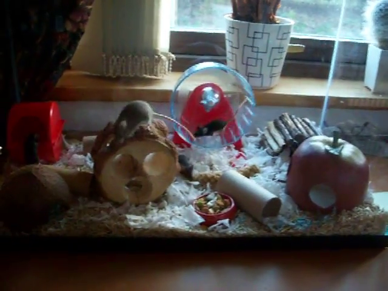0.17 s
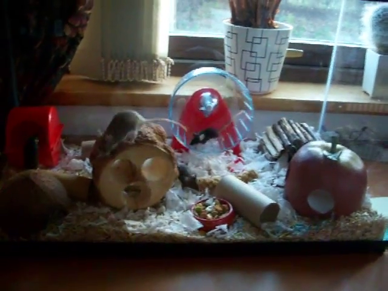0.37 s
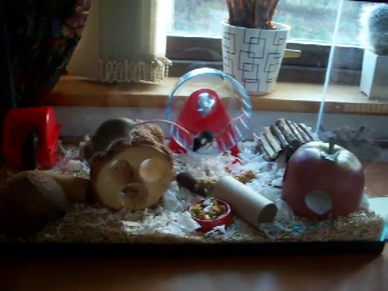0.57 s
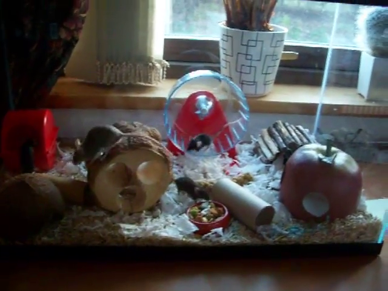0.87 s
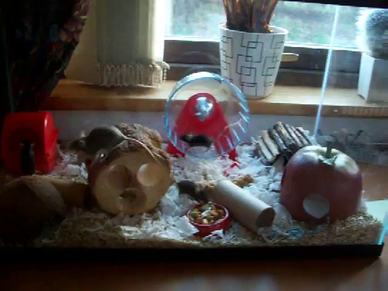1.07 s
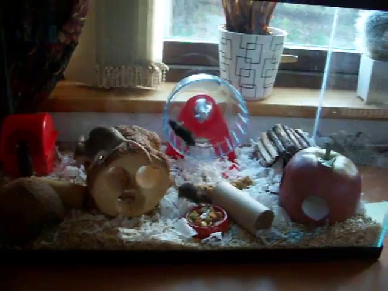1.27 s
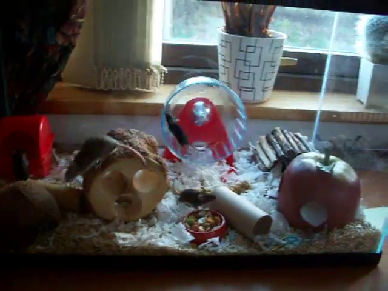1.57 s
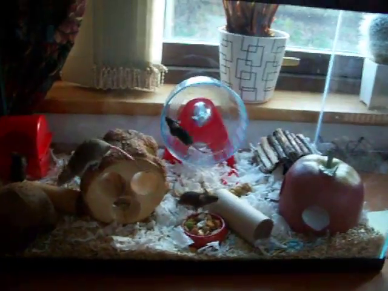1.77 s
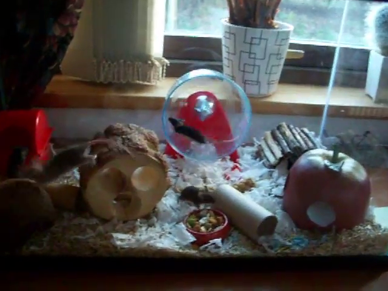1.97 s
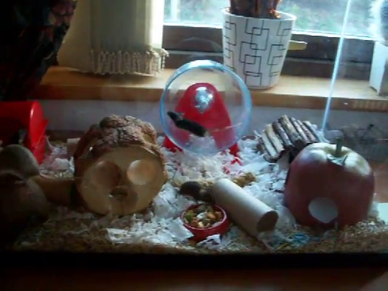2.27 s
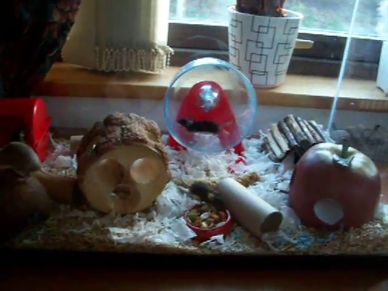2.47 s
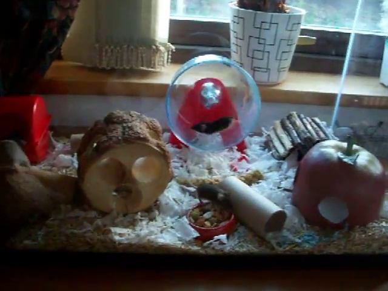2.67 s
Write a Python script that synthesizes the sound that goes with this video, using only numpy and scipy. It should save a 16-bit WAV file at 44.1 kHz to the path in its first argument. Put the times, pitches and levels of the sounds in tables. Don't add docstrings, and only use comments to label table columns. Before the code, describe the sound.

A mouse runs in a plastic exercise wheel, paws thumping fast and hollow, then stopping

```python
import sys
import numpy as np
from scipy import signal
from scipy.fft import rfft, irfft
from scipy.io import wavfile
from scipy.ndimage import uniform_filter1d

SR = 44100
rng = np.random.default_rng(int(sys.argv[2]) if len(sys.argv) > 2 else 0)


def put_to_file(sound):
    columns = np.atleast_2d(sound).T
    safe = np.clip(columns, -1, 1)
    whole_steps = np.round(safe * 32767)
    wavfile.write(sys.argv[1], SR, whole_steps.astype(np.int16))


def nominal_scale(level):
    x = np.asarray(level, float) / 20
    return 10 ** x


N = 123921
T = np.arange(N) / SR

# [f/Hz, level/dB, t60/s]
WHEEL = [(167.5, -17.5, 0.22), (256, -13.5, 0.13), (324.74, -0.5, 0.13), (346.9, -4, .2),
         (396.6, -12, 0.22), (422.6, -13.5, 0.14), (547, -21, 0.13), (730, -35, .08), (844, -10, .12),
         (903, -23.5, .12), (1000, -6.5, 0.04), (1200, -28.5, 0.076), (1440, -13.5, .07)]
# [f/Hz, density/dB per Hz]
SLAP = [(300, -35.5), (500, 3.5), (1000, 2.5), (1600, -7), (2500, -12), (4000, -29.5), (8000, -23)]


def unit(x):
    return x / np.sqrt(np.mean(x ** 2))


def curve(rows, col=1):
    rows = np.array(rows)
    return np.interp(T, rows[:, 0], rows[:, col])


def sine(hz):
    return np.sin(2 * np.pi * np.cumsum(hz) / SR)


def coloured(points):
    hz, db = np.array(points, float).T
    log_f = np.log(np.maximum(np.arange(N // 2 + 1) * SR / N, 1))
    below = np.maximum(np.log(hz[0]) - log_f, 0)
    gain = nominal_scale(np.interp(log_f, np.log(hz), db) - 30 * below)
    return unit(irfft(rfft(rng.standard_normal(N)) * gain, N))


def narrow(hz, width_hz):
    b, a = signal.iirpeak(hz, hz / width_hz, SR)
    once = signal.lfilter(b, a, rng.standard_normal(N))
    return unit(signal.lfilter(b, a, once))


def walk(rate_hz):
    k = int(SR / rate_hz)
    steps = np.repeat(rng.standard_normal(N // k + 1), k)
    return unit(uniform_filter1d(uniform_filter1d(steps, k), k)[:N])


def ring(hz, t60_s, size):
    t = np.arange(size) / SR
    return np.sin(2 * np.pi * hz * t) * 1000. ** (-t / t60_s)


def burst(rise_s, t60_s):
    t = np.arange(SR // 2) / SR
    return (1 - np.exp(-t / rise_s)) * 1000. ** (-t / t60_s)


def add(out, at_s, x):
    i = int(np.clip(at_s * SR, 0, N - 1))
    out[i:i + len(x)] += x[:N - i]


def house():
    # [t/s, f/Hz, level/dB]
    motor = [(0, 66, -41), (.09, 67.3, -39.5), (.125, 67.7, -64), (.16, 66.8, -40), (.3, 66.8, -50),
             (.75, 69.8, -55), (1.1, 67.9, -52), (1.35, 68.38, -48.5), (1.55, 65.97, -45),
             (2.0, 65.3, -44.5), (2.4, 65.24, -41), (2.81, 62.9, -37)]
    # [t/s, level/dB]
    traffic = [
        (0, -54),
        (.5, -47),
        (1.1, -43.5),
        (1.5, -54.5),
        (2.1, -50),
        (2.5, -52),
        (2.7, -44.5),
        (2.81, -53),
    ]
    line = np.sqrt(2) * sine(curve(motor))
    rough = nominal_scale(-16) * narrow(66, width_hz=5.7)
    hum = nominal_scale(curve(motor, col=2)) * (line + rough)
    rumble = nominal_scale(curve(traffic)) * narrow(45.3, width_hz=7.9)
    sub = nominal_scale(-57) * narrow(25, width_hz=56)
    return hum + rumble + sub


def camera():
    # [f/Hz, density/dB per Hz]
    air = [(80, -6.5), (130, -9), (300, -11), (620, -22), (1500, -30), (3400, -33.5), (6000, -36),
           (9000, -37.5)]
    air_db, flicker_db = -44.5, .3
    whine_hz, whine_db = 4290, -69
    hiss = nominal_scale(air_db + flicker_db * walk(5.2)) * coloured(air)
    whine = nominal_scale(whine_db) * np.sqrt(2) * np.sin(2 * np.pi * whine_hz * T)
    return hiss + whine


def rolling():
    # [t/s, effort/dB]
    effort = [(0.0, -64), (0.29, -47.5), (0.44, -42.5), (0.94, -39.5), (1.07, -39), (1.35, -41),
              (1.5, -40.5), (2.04, -46), (2.31, -49), (2.54, -59), (2.81, -67)]
    # [t/s, level/dB]
    wobble = [(0.0, -79), (0.22, -41), (0.24, -47), (1.13, -44), (1.22, -62), (1.51, -45.5), (2.13, -55),
              (2.28, -52), (2.32, -54), (2.37, -64), (2.5, -54.5), (2.81, -42.5)]
    # [f/Hz, width/Hz, level/dB]
    floor_modes = [(101.8, 9.6, 0), (165, 10.7, -6.5)]
    roll_db, hiss_db = -4.5, -7.5
    shake = unit(sum(nominal_scale(db / 2) * narrow(hz, 2.2 / t60_s + 8) for hz, db, t60_s in WHEEL[1:7]))
    hiss = nominal_scale(hiss_db) * coloured(SLAP)
    floor = np.zeros(N)
    for hz, width_hz, db in floor_modes:
        line = sine(hz * (1 + .02 * walk(4.05)))
        floor += nominal_scale(db) * (narrow(hz, width_hz) + line)
    return nominal_scale(curve(effort) + roll_db) * (shake + hiss) + nominal_scale(curve(wobble) - 2) * floor


def scrapes():
    # [t/s, level/dB, f/Hz, dust re level/dB]
    events = [(0.0044, -42, 4290, -6), (0.0857, -40.5, 4290, -18), (0.2358, -39, 2940, -17),
              (0.417, -41.5, 2140, -9), (0.4476, -43, 2470, -13), (0.4947, -36.5, 3470, -16),
              (0.61, -39.5, 2080, -3.5), (0.632, -42, 4400, -12), (0.6788, -36.5, 2990, -11),
              (0.8089, -39.5, 3390, -4.5), (0.82, -35, 5230, -23), (0.8441, -39.5, 5000, -23),
              (0.8787, -41.5, 3950, -10), (0.9782, -39.5, 3660, -4.5), (1.0061, -39, 3070, -8.5),
              (1.0397, -33, 4020, -11.5), (1.0697, -38.5, 2110, -13), (1.1919, -34, 3970, -7.5),
              (1.2127, -36.5, 5360, 0), (1.2577, -38.5, 2800, -9), (1.2837, -43.5, 2710, -21),
              (1.3507, -33, 3990, -7), (1.3853, -38, 2150, -26), (1.4487, -33.5, 4520, -6.5),
              (1.5395, -41, 3282, -24), (1.707, -35, 2390, -31), (1.7454, -48, 2278, -20),
              (1.827, -41, 2330, -17), (1.8424, -38.5, 2760, -25)]
    # [f/Hz, density/dB per Hz]
    rustle = [(1200, -28.5), (2000, -5), (3500, -5), (5000, -7), (8500, -18)]
    # [f/Hz, density/dB per Hz]
    fine_dust = [(3500, -11), (5000, 2.5), (7000, 2.5), (9000, -14)]
    count, swarm_s = 45, 0.027
    scrape_db, tick_db, size_db = -34, 22.5, 2.5
    grain_t60_s, grain_spread = .012, .4
    squeak_share, squeak_spread, squeak_t60_s, squeak_db = .16, .03, .03, 3
    rustle_db, dust_db = -11.5, -4.5

    grains, wash, dust = np.zeros((3, N))
    for at_s, db, hz, event_dust_db in events:
        grain_db = db + scrape_db
        add(grains, at_s, nominal_scale(grain_db + tick_db) * ring(hz, grain_t60_s * 4, size=1500))
        delays, sizes = rng.exponential(size=(2, count))
        detunes = rng.standard_normal(count)
        for k, (delay, big, detune) in enumerate(zip(delays, sizes, detunes)):
            if k < squeak_share * count:
                pitch_hz = hz * np.exp(squeak_spread * detune)
                t60_s, extra_db = squeak_t60_s, squeak_db
            else:
                pitch_hz = hz * 1.2 * np.exp(grain_spread * detune)
                t60_s, extra_db = grain_t60_s, 0
            grain = ring(np.clip(pitch_hz, 800, 8800), t60_s, size=1500)
            add(grains, at_s + delay * swarm_s, nominal_scale(grain_db + extra_db + size_db * big) * grain)
        add(wash, at_s, nominal_scale(db + rustle_db) * burst(0.0012, t60_s=0.15))
        add(dust, at_s, nominal_scale(db + event_dust_db + dust_db) * burst(0.00078, t60_s=0.063))
    return grains + wash * coloured(rustle) + dust * coloured(fine_dust)


def bend():
    from_hz, to_hz, glide_s = 1900, 778, 0.014
    t = T[:SR // 8]
    hz = to_hz + (from_hz - to_hz) * np.exp(-t / glide_s)
    return sine(hz) * burst(0.0071, t60_s=.12)[:len(t)]


def footfalls():
    # [t/s, level/dB, slap re ring/dB]
    steps = [(.097, -44, -4), (.25, -21.5, -12.5), (.299, -33, -9), (.354, -25.5, -35),
             (0.397, -33.5, -28.5), (.454, -21.5, -11.5), (.471, -24, -19.5), (0.571, -25, -16.5),
             (.609, -30, -17), (.655, -22.5, -14.5), (.671, -22.5, -14), (0.709, -36.5, -24.5),
             (.79, -25.5, -20), (.871, -20.5, -13.5), (0.92, -37, -16), (0.978, -21.5, -11),
             (1.098, -23, -18.5), (1.181, -22, -11.5), (1.196, -23.5, -13), (1.26, -22.5, -23),
             (1.275, -27, -34), (1.309, -35.5, -3.5), (1.388, -17, -5.5), (1.428, -19, -22),
             (1.464, -32, -8), (1.514, -28, -8), (1.713, -19, -10), (1.727, -29.5, -11), (1.757, -24.5, -8),
             (2.47, -41, -15)]
    lead_s, paw_s, paw_roll_s = 0.009066, 0.0014, 0.0078
    scatter_db, jitter = 1., .003
    slap_level_db, bend_db = -10, -7
    size = SR // 3
    paw = np.hanning(int(paw_s * SR))
    paw /= paw.sum()
    onset = 1 - np.exp(-T[:size] / paw_roll_s)

    rings, slap = np.zeros((2, N))
    for at_s, db, slap_db in steps:
        start_s = at_s - lead_s
        body = np.zeros(size)
        for k, (hz, mode_db, t60_s) in enumerate(WHEEL):
            loud, tune = rng.standard_normal(2)
            mode = ring(hz * (1 + jitter * tune), t60_s, size)
            body += (-1) ** k * nominal_scale(mode_db + scatter_db * loud) * mode
        add(rings, start_s, nominal_scale(db) * np.convolve(body * onset, paw))
        add(rings, start_s, nominal_scale(db + slap_db + bend_db) * bend())
        add(slap, start_s, nominal_scale(db + slap_db + slap_level_db) * burst(0.016, t60_s=0.26))
    return rings + slap * coloured(SLAP)


def room(x):
    b, a = signal.butter(1, 500, "high", fs=SR)
    tail = signal.lfilter(b, a, rng.standard_normal(SR // 2)) * burst(0.004, t60_s=.4)
    tail /= np.sqrt(np.sum(tail ** 2))
    return x + nominal_scale(-7) * signal.fftconvolve(x, tail)[:N]


def scene():
    background = house() + camera()
    wheel = rolling()
    mouse = room(scrapes() + footfalls())
    return (mouse + wheel + background)[None]


def roll_off(x):
    return signal.sosfilt(signal.butter(12, 8920, fs=SR, output="sos"), x)


def record(dry):
    rolloff = signal.butter(9, 7550, fs=SR, output="sos")
    stop = signal.cheby2(12, 50, 9420, fs=SR, output="sos")
    x = signal.sosfilt(rolloff, dry)
    x = signal.sosfilt(stop, x)
    return roll_off(x)


dry = scene()
out = record(dry)
put_to_file(out)
```